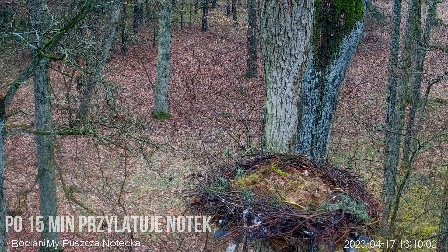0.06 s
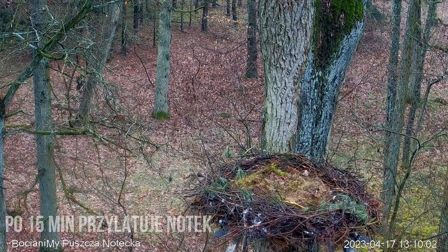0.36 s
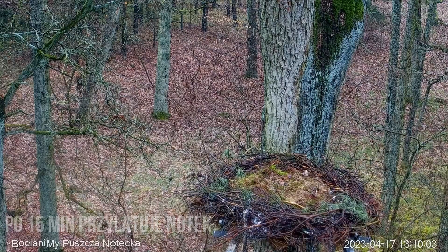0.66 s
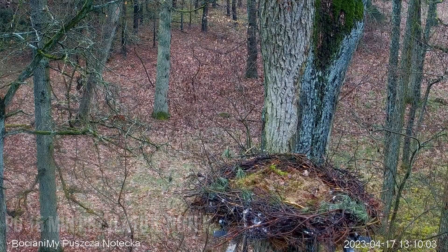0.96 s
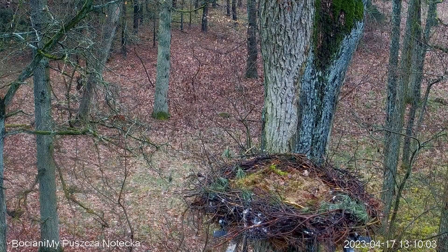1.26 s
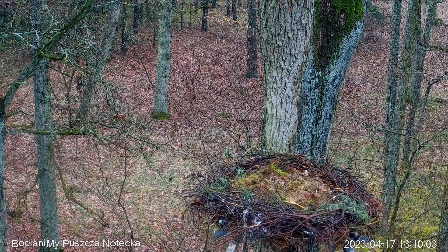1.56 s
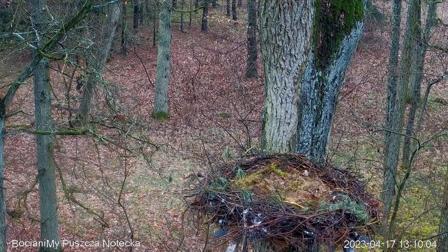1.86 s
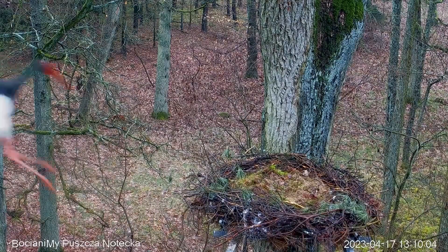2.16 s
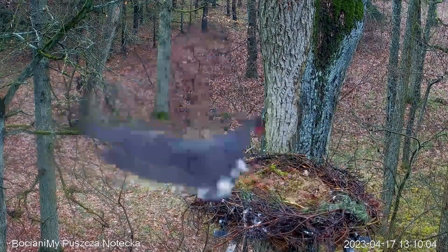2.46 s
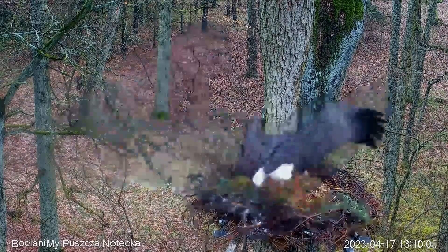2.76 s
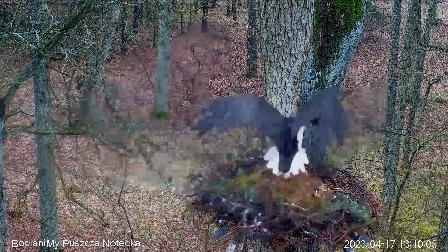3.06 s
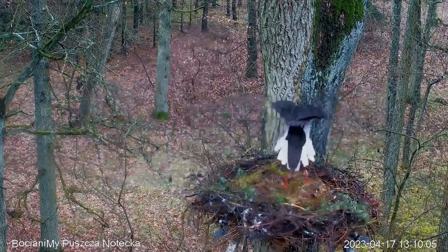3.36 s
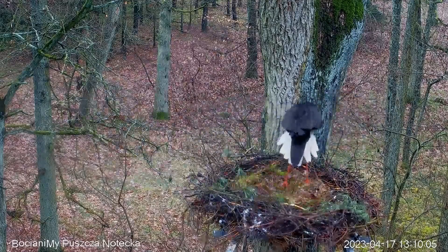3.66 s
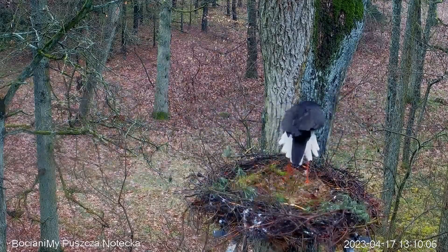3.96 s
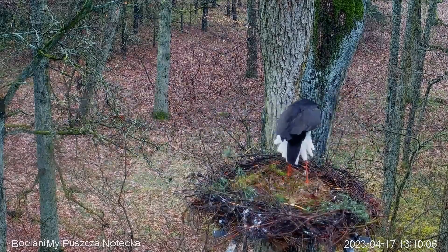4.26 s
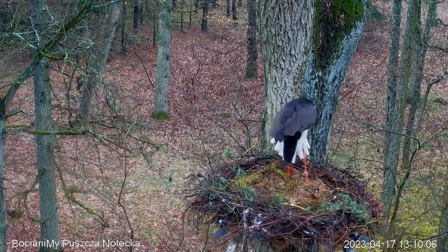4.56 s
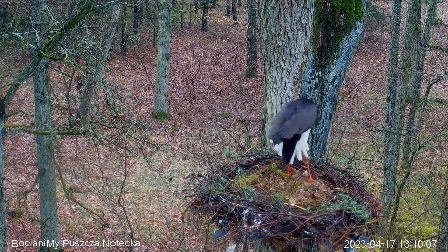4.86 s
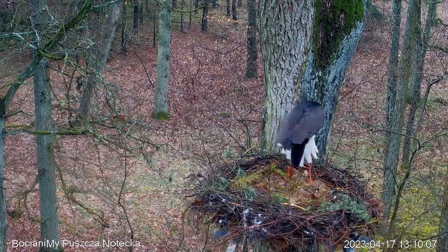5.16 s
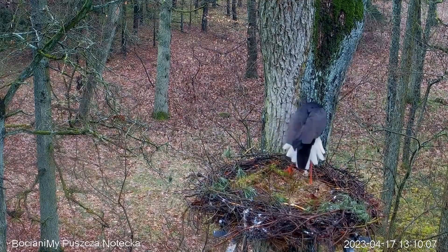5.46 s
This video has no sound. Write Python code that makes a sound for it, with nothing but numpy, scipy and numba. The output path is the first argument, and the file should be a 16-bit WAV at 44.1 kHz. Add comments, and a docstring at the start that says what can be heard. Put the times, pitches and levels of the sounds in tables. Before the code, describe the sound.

A stork arrives at its nest among trees, heard through a close, slightly dull and compressed microphone. First come a faint low murmur, thin distant birdsong and a dry twig snap. Then heavy wings swish and thump, mixed with two bright chirps, and sticks crack on landing. The stork calls about twice a second, six high arched whistles alternating with hoarse hisses, each echoing lightly. A softer crack comes near the end.

```python
"""A black stork flies in to its nest in a softly murmuring wood, where the trunks echo every call.
First small birds whistle, a twig snaps and something rasps far off. Then the stork's wings rush and
thump as it brakes, while a small bird chirps twice. The stork greets with six arched whistles that its
windpipe pulls into steps, and draws air with a hoarse hiss between them. A crack comes as it lands and
one near the end. A nest camera hears it all, with noise reduction, a hard limiter and a low sample rate."""
import sys
import numpy as np
from scipy import signal
from scipy.fft import rfft, irfft
from scipy.io import wavfile
from scipy.ndimage import uniform_filter1d, map_coordinates
from numba import njit

SR = 44100
rng = np.random.default_rng(int(sys.argv[2]) if len(sys.argv) > 2 else 0)


def output_pcm(signal):
    """Save a mono or channel-first signal as 16-bit PCM at the path in sys.argv[1].

    Samples are clipped to [-1, 1] before scaling.
    """
    pcm = np.clip(np.atleast_2d(signal).T, -1, 1) * 32767
    wavfile.write(sys.argv[1], SR, np.round(pcm).astype(np.int16))


N = 251811
T = np.arange(N) / SR

# The stork's whistles. The voice aims at these pitches; squareness 1 is a pointed arch, 3 a flat top.
# (start [s], crest [s], end [s], first pitch [Hz], crest pitch [Hz], last pitch [Hz], squareness,
# middle break going up [Hz], going down [Hz], level [dB], leaking air [dB], octave [dB], throat hiss [dB])
STORK_NOTES = [ (2.706, 2.803, 2.904, 2100, 4150, 2050, 3.1, 3880, 3990, -19.5, -20, -45, -49),
               (3.210, 3.312, 3.443, 2400, 4105, 2400, 3.1, 3915, 3300, -19.5, -22, -45, -54),
               (3.725, 3.848, 3.985, 2150, 3825, 2700, 2.9, 3660, 3260, -19, -21, -41, -55),
               (4.283, 4.414, 4.512, 3197, 4370, 3120, 1.45, 3495, 3080, -18.5, -21, -50, -48),
               (4.803, 4.945, 5.073, 2475, 3935, 2300, 3, 3620, 3516, -18.5, -21, -41, -61),
               (5.351, 5.428, 5.433, 2560, 3520, 3500, 2.5, 3900, 3900, -19, -20, -52, -66)]
# Windpipe resonances (pitches it likes to ring at) that pull on the whistle (pitch [Hz], level [dB])
PIPE_STEPS = [(2470, -2), (3440, -2.5), (3885, -0.5), (4300, -2)]
# Moments when the voice catches and turns weak and hoarse (time [s], half length [s], dip [dB])
VOICE_CATCHES = [(2.735, .009, -4), (2.776, .008, -9), (2.815, .03, -2.5), (2.848, .008, -10),
                 (2.885, .005, -6), (3.212, 0.0095, -13), (3.366, 0.015, -13), (3.42, .008, -7),
                 (3.767, 0.0098, -6), (3.975, 0.014, -14), (4.4, .04, -3.5), (4.874, 0.022, -11.5),
                 (4.91, .008, -6), (4.952, 0.011, -11), (5.04, .015, -9), (5.364, 0.012, -9),
                 (5.435, .008, -8)]
# Air that leaks past the whistle (frequency [Hz], level [dB])
LEAK_SPECTRUM = [(200, -45.5), (500, -22), (900, -19.5), (1250, -7.5), (2000, -15.5), (2620, 6), (3050, 0),
                 (3500, -11.5), (4300, -4), (5000, -9.5), (5700, -15), (8000, -26.5)]
# A soft, low wheeze (start [s], end [s], first pitch [Hz], last pitch [Hz], level [dB])
WHEEZES = [(1.72, 1.97, 1083, 1350, -54.5), (3.19, 3.25, 1020, 1080, -52), (3.29, 3.43, 1259, 1352, -48),
           (3.88, 4.10, 1176, 1318, -52.5), (4.565, 4.79, 1156, 1297, -45), (5.00, 5.23, 1298, 1214, -50.5)]
# The stork's hisses; in each one the lowest windpipe resonance slides
# (start [s], end [s], slide from [Hz], slide to [Hz], slide width [Hz], slide level [dB],
# throat [dB], windpipe [dB], bill [dB], high "sss" [dB])
STORK_HISSES = [(2.478, 2.688, 2540, 2400, 985, -35.5, -46, -39.5, -39, -51),
                (2.926, 3.164, 2585, 2260, 1110, -36.5, -43.5, -36.5, -43.5, -74.5),
                (3.489, 3.692, 2320, 2444, 774, -35.5, -39.5, -37, -45, -61),
                (4.02, 4.222, 2434, 2360, 1068, -37.5, -45, -38, -47.5, -58),
                (4.567, 4.773, 2710, 2247, 827, -40, -60, -50, -47, -56.5),
                (5.128, 5.3, 2503, 2280, 327, -37.5, -64, -37, -48.5, -55.5),
                (5.435, 5.594, 2850, 2825, 730, -40.5, -54, -34, -45, -88),
                (5.628, 5.797, 2507, 2420, 444, -45, -54, -51, -58, -76)]
# Resonances of throat, windpipe, bill and the high "sss" (frequency [Hz], width [Hz], level [dB])
THROAT_RINGS = [(1610, 190, 7.5), (1950, 220, 3)]
PIPE_RINGS = [(3430, 170, 1.5), (3847, 170, -1.5)]
BILL_RINGS = [(4534, 470, 4.9), (5005, 180, 2.4)]
SSS_RINGS = [(6150, 550, 2.5), (6880, 560, -4), (7510, 290, -7.5)]
# Wingbeats as the stork brakes
# (time [s], thump pitch [Hz], thump [dB], buffeting air [dB], feather rush [dB], wing tip hiss [dB])
WINGBEATS = [(1.499, 188, -48.5, -61, -68, -72), (1.849, 166, -46.5, -44, -53.5, -63),
             (2.043, 140.6, -24.5, -31.5, -35, -65.5), (2.296, 159, -23, -36, -37, -56.5),
             (2.52, 136, -32.5, -45.5, -51.5, -60.5), (2.7, 189, -39.5, -68.5, -52, -52)]
# Buffeting air, rushing feathers and hissing wing tips (frequency [Hz], level [dB])
BUFFET_SPECTRUM = [(30, -58), (70, -28), (100, -11.5), (125, -2), (160, 4), (230, -1), (320, -19.5),
                   (600, -57.5)]
FEATHER_SPECTRUM = [(50, -35), (150, -18), (350, -3), (550, 2.5), (750, -2), (1300, 9), (2000, 2.5),
                    (3200, -4), (5000, -7), (6800, -16), (8000, -38)]
WING_TIP_SPECTRUM = [(1500, -26), (3000, -4.5), (5000, -2.5), (6800, -7), (8000, -6)]
# A twig snaps and its echoes follow; later, two more cracks (time [s], strength [dB])
SNAPS_AND_ECHOES = [(0.9284, -21.5), (0.9305, -21), (0.9361, -22.5), (0.94, -38), (0.9696, -33.5),
                    (1.106, -47.5), (2.535, -19), (5.643, -36.5)]
# Resonances of a dry twig (frequency [Hz], width [Hz], level [dB])
TWIG_RINGS = [(863, 330, -5.5), (1820, 600, -7.5), (2020, 590, 0), (3520, 1660, -5.5), (5190, 1250, -13)]
# One small bird's repeated chirp (time of highest pitch [s], level [dB])
BIRD_CHIRPS = [(1.906, -29), (2.148, -26.5)]
# Thin whistles of small birds (start [s], end [s], first pitch [Hz], last pitch [Hz], level [dB])
BIRD_NOTES = [(0, .08, 4405, 4480, -55), (1.21, 1.83, 4920, 4810, -72), (1.31, 1.38, 4840, 4900, -62),
              (1.60, 1.76, 7690, 6880, -64.5), (1.781, 1.845, 7110, 5120, -52.5),
              (2.418, 2.447, 2672, 2770, -39), (4.14, 4.29, 7550, 7410, -60.5)]
# Resonances of a far-off rasping call (frequency [Hz], width [Hz], level [dB])
RASP_RINGS = [(2567, 350, -5.5), (3420, 400, -8)]
# The wood's low murmur and its faint rustle (frequency [Hz], level [dB])
MURMUR_SPECTRUM = [(25, -29.5), (60, -32.5), (90, -11), (130, 6), (170, 3), (230, -3), (330, -29.5),
                   (700, -50.5)]
RUSTLE_SPECTRUM = [(100, -13), (300, -6.5), (700, -0.5), (2000, -5.5), (4000, -2.5), (8000, -15.5)]
# Echoes off the nearest trunks and branches (delay [s], level [dB])
TRUNK_ECHOES = [(.0075, -15), (0.0104, -15), (0.044, -24.5)]
# How the camera boosts or cuts the treble (frequency [Hz], gain [dB])
CAMERA_TREBLE = [(6500, -1.5), (7500, 3.5), (8000, 0), (8600, -2), (9300, -36), (10500, -53.5),
                 (12000, -52), (15000, -59.5)]


def whistles(jitter=.018, flutter_db=3.8, octave_growth=1.64, edge_s=.003):
    """The stork's notes: a hoarser one leaks more air and wavers more; a catch brings out the octave."""
    out = np.zeros(N)
    air = patchy(noise(LEAK_SPECTRUM), db=8)
    waver, flutter = wander(500), wander(170)
    throat = blown(THROAT_RINGS[:1], np.ones(N))
    catch_db = sum(db * np.exp(-((T - at) / length) ** 2) for at, length, db in VOICE_CATCHES)
    for start, crest, end, *shape, db, leak_db, octave_db, throat_db in STORK_NOTES:
        envelope = gate(start, end, edge_s)
        on = envelope > .001
        hz, gain = windpipe_steps(T[on], start, crest, end, *shape)
        hoarse = undb(leak_db - catch_db[on])
        phase = 2 * np.pi * np.cumsum(hz * (1 + jitter * hoarse * waver[on])) / SR
        octave = undb(octave_db - octave_growth * catch_db[on])
        tone = np.sqrt(2) * (np.sin(phase) + octave * np.sin(2 * phase))
        tone *= undb(flutter_db * np.sqrt(hoarse) * flutter[on])
        out[on] += undb(db + catch_db[on]) * envelope[on] * gain * (tone + hoarse * air[on])
        out += undb(throat_db) * envelope * throat
    return out


def windpipe_steps(t, start, crest, end, first, top, last, squareness, break_up, break_down,
                   low_break_hz=3002, high_break_hz=4140, pull=.51):
    """One whistle's pitch and gain: the voice arches smoothly, the windpipe pulls it into steps."""
    strain = 1 - np.interp(t, [start, crest, end], [1, 0, 1]) ** squareness
    foot = np.where(t < crest, first, last)
    aim = foot + (top - foot) * strain
    middle_break = np.where(t < crest, break_up, break_down)
    step = np.sum([aim > low_break_hz, aim > middle_break, aim > high_break_hz], axis=0)
    pipe_hz, pipe_db = np.array(PIPE_STEPS)[step].T
    hz = aim + pull * (pipe_hz - aim)
    gain = undb(pipe_db)
    for i in np.flatnonzero(np.diff(step)):  # the tone falters at each break, more for a wider jump
        jump_hz = abs(hz[i + 1] - hz[i])
        depth, falter_s = min(1, jump_hz / 400), 1.4e-5 * jump_hz
        gain *= 1 - depth * np.exp(-((t - t[i]) / falter_s) ** 2)
    return hz, gain


def hisses(core_width_hz=170, core_db=-3, crest=.59, swell_db=14, rasp_db=1.77, waver_db=.8):
    """The stork draws air with a hoarse hiss that brightens and shifts as its throat tightens."""
    tighten, slide, throat, pipe, bill, sss = np.zeros((6, N))
    for start, end, first, last, width, slide_db, throat_db, pipe_db, bill_db, sss_db in STORK_HISSES:
        on = gate(start, end, .018)
        progress = np.clip((T - start) / (end - start), 0, 1)
        slack_db = -swell_db * ((progress - crest) / crest) ** 2  # quieter either side of the crest
        tighten += on * (progress - .5)
        slide_hz = first + (last - first) * progress
        broad = unit(resonance(rng.standard_normal(N), slide_hz, width))
        core = unit(resonance(rng.standard_normal(N), slide_hz, core_width_hz))  # half whistled
        slide += on * undb(slide_db + .051 * slack_db) * unit(broad + undb(core_db) * core)
        throat += on * undb(throat_db + .42 * slack_db)
        pipe += on * undb(pipe_db + .33 * slack_db)
        bill += on * undb(bill_db + slack_db)
        sss += on * undb(sss_db + 2.5 * slack_db)
    pipe_stretch = 1 + .022 * tighten
    air = (slide
           + throat * blown(THROAT_RINGS, 1 + .26 * tighten)
           + pipe * blown(PIPE_RINGS, pipe_stretch)
           + bill * blown(BILL_RINGS, 1 + .08 * tighten)
           + sss * blown(SSS_RINGS, pipe_stretch))
    air = np.std(air) * patchy(air, db=3)
    return air * undb(rasp_db * wander(350) + waver_db * wander(35))


def wheeze():
    """Soft, low tones under the stork's whistles and hisses."""
    return tones(WHEEZES, bow=680, edge_s=.026, jitter=.015, flutter_db=2.5, octave_db=-26.5)


def wings(arrive_s=1.836, fold_s=2.703, lead_s=.028, thump_s=.018, sag_hz_per_s=1160, flutter_db=2):
    """Air streams over the braking wings; each downstroke swishes, then thumps with a puff of air."""
    approach_db = -140 * np.maximum(arrive_s - T, 0)
    fold_db = -201.5 * np.maximum(T - fold_s, 0)
    glide = undb(approach_db + fold_db)
    buffet, rush = undb(-46) * glide, undb(-46.5) * glide
    tips, thumps = np.zeros((2, N))
    for at, hz, thump_db, buffet_db, rush_db, tips_db in WINGBEATS:
        swish = downstroke(at - lead_s)
        tips += undb(tips_db) * swish
        rush += undb(rush_db) * swish
        buffet += undb(buffet_db) * downstroke(at)
        age = T - at
        phase = 2 * np.pi * (hz - sag_hz_per_s * age / 2) * age  # deepens as the wing passes
        thumps += undb(thump_db) * np.exp(-.5 * (age / thump_s) ** 2) * np.sin(phase)
    feathers = patchy(noise(FEATHER_SPECTRUM), db=2.5)
    near = np.interp(T, [1.78, 1.92], [0, 1])  # from further off the feathers sound duller
    feathers = near * feathers + (1 - near) * colour(feathers, [(1600, 4.5), (2600, 2)])
    feathers *= undb(flutter_db * wander(120))
    return rush * feathers + tips * noise(WING_TIP_SPECTRUM) + buffet * noise(BUFFET_SPECTRUM) + thumps


def downstroke(at, rise_s=.027, fall_s=.093):
    """The loudness of one wingbeat swells quickly and dies away more slowly."""
    return np.exp(-.5 * ((T - at) / np.where(T < at, rise_s, fall_s)) ** 2)


def twigs(crack_s=.001, splinter_s=.03, splinter_db=-20):
    """A snap, its echoes and two later cracks: sharp bursts with splintering tails ring like dry wood."""
    force = np.zeros(N)
    for at, db in SNAPS_AND_ECHOES:
        age = T[T >= at] - at
        splinters = undb(splinter_db) * np.exp(-age / splinter_s)
        force[T >= at] += undb(db) * (np.exp(-age / crack_s) + splinters)
    wood = sum(undb(db) * resonance(force * rng.standard_normal(N), hz * np.ones(N), width)
               for hz, width, db in TWIG_RINGS)
    return undb(10.5) * wood


def chirps(foot_hz=2540, top_hz=4454, end_hz=4186, sweep_s=.034, sag_s=.042, fade_db_per_s=110):
    """A small bird sings a soft, reedy upward sweep, then a loud note that sags and fades."""
    song = np.zeros(N)
    for at, db in BIRD_CHIRPS:
        song += tones([(at - sweep_s, at, foot_hz, end_hz, db - 15)],
                      edge_s=.0096, jitter=.034, flutter_db=.5, octave_db=-24)
        note = tones([(at, at + sag_s, top_hz, end_hz, db)],
                     edge_s=.004, jitter=.0082, flutter_db=1.5, octave_db=-34.5)
        song += note * undb(-fade_db_per_s * np.maximum(T - at, 0))
    return song


def songbirds():
    """Small birds whistle thin, almost pure notes in the trees."""
    return tones(BIRD_NOTES, edge_s=.0076, jitter=.0065, flutter_db=2.8, octave_db=-41.5)


def far_rasp(rise=.059):
    """One rasping call from among the trees, rising a little in pitch."""
    db = np.interp(T, [1.295, 1.312, 1.43, 1.5, 1.58], [-70.5, -50.5, -47.5, -50.5, -78])
    stretch = 1 + rise * np.interp(T, [1.3, 1.45], [-.5, .5])
    loudness = undb(db + 1.9 * wander(250)) * gate(1.28, 1.6, .005)
    return loudness * patchy(blown(RASP_RINGS, stretch), db=5)


def murmur(low_db=-68, swell_db=3.5, rustle_db=-73.5):
    """Low, restless air in the wood, with faint rustles."""
    low = undb(low_db + swell_db * wander(25)) * patchy(noise(MURMUR_SPECTRUM), db=2.5, width_hz=33)
    return low + undb(rustle_db) * patchy(noise(RUSTLE_SPECTRUM), db=4.5)


def forest(x, tail_db, decay_s, build_s=.0009):
    """Near trunks echo at once; far ones blur into a tail that falls 60 dB in decay_s."""
    t = T[:SR]
    tail = colour(rng.standard_normal(SR), [(200, -20.5), (800, 4), (4000, 3.5), (8000, -2)])
    tail *= np.exp(-np.log(1000) * t / decay_s) * (1 - np.exp(-t / build_s))
    echoes = undb(tail_db) * tail / np.sqrt(np.sum(tail ** 2))
    for delay, db in TRUNK_ECHOES:
        echoes[int(delay * SR)] += undb(db)
    return x + signal.fftconvolve(x, echoes)[:N]


def tones(table, edge_s, jitter, flutter_db, octave_db, bow=0):
    """Almost pure sliding notes; bow [Hz per s squared] lifts the pitch in the middle of each."""
    out = np.zeros(N)
    waver, flutter = 1 + jitter * wander(500), undb(flutter_db * wander(90))
    for start, end, first, last, db in table:
        on = (T > start - edge_s) & (T < end + edge_s)
        t = T[on]
        hz = np.interp(t, [start, end], [first, last]) + bow * (t - start) * (end - t)
        phase = 2 * np.pi * np.cumsum(hz * waver[on]) / SR
        inside = np.clip(np.minimum(t - start, end - t) / edge_s, -1, 1)
        fade = .5 + .5 * np.sin(np.pi / 2 * inside)
        tone = np.sqrt(2) * (np.sin(phase) + undb(octave_db) * np.sin(2 * phase))
        out[on] += undb(db) * flutter[on] * fade * tone
    return out


def blown(rings, stretch):
    """Rushing air through resonances whose frequencies are all multiplied by stretch."""
    return unit(sum(undb(db) * resonance(rng.standard_normal(N), hz * stretch, width)
                    for hz, width, db in rings))


def patchy(x, db, width_hz=170, hold_s=.06):
    """Make the sound patchy and streaky: each narrow band swells and fades at random."""
    f, t, cells = signal.stft(x, SR, nperseg=512)
    chance = rng.standard_normal((1024, 1024))
    grid = np.meshgrid(f / width_hz, t / hold_s, indexing="ij")
    swell = map_coordinates(chance, grid, order=1, mode="wrap")
    return unit(signal.istft(cells * undb(db * unit(swell)), SR)[1][:N])


def resonance(x, hz, width):
    """Keep the sound near hz, filtering twice for a sharper cut."""
    return bandpass(bandpass(x, hz, float(width)), hz, float(width))


@njit
def bandpass(x, hz, width):
    """A filter that lets through one band, whose centre can move."""
    y, band, low = np.empty(len(x)), 0., 0.
    for i in range(len(x)):
        tuning, damping = np.tan(np.pi * hz[i] / SR), width / hz[i]
        ring = (band + tuning * (x[i] - low)) / (1 + tuning * (tuning + damping))
        band, low = 2 * ring - band, low + 2 * tuning * ring
        y[i] = damping * ring
    return y


def noise(points):
    """Noise shaped by a spectrum, with an average (rms) size of 1."""
    return unit(colour(rng.standard_normal(N), points))


def colour(x, points):
    """Boost or cut x along a curve of (frequency [Hz], gain [dB]) points."""
    hz, db = np.transpose(points)
    f = np.maximum(np.fft.rfftfreq(len(x), 1 / SR), 1)
    return irfft(rfft(x) * undb(np.interp(np.log(f), np.log(hz), db)), len(x))


def wander(rate):
    """A smooth random wobble that changes about rate times a second."""
    hold = max(int(SR / rate), 1)
    steps = np.repeat(rng.standard_normal(N // hold + 1), hold)
    return unit(uniform_filter1d(steps, hold)[:N])


def gate(start, end, edge):
    """1 from start to end and 0 outside, with soft edges."""
    return (1 + np.tanh((T - start) / edge)) / 2 * (1 + np.tanh((end - T) / edge)) / 2


def unit(x):
    """Scale to an average (rms) size of 1."""
    return x / np.sqrt(np.mean(x ** 2))


def undb(db):
    """Turn decibels into a number to multiply by."""
    return 10 ** (np.asarray(db) / 20)


def reduce_noise(x, quiet_db=-90.5, floor_db=-7.5):
    """The camera turns down bands that stay quiet, so echoes break up and die early."""
    cells = signal.stft(x, SR, nperseg=512)[2]
    power = uniform_filter1d(np.abs(cells) ** 2, size=7, axis=1) + 1e-18
    gain = np.maximum(power / (power + undb(quiet_db) ** 2), undb(floor_db))
    return signal.istft(cells * gain, SR)[1][:N]


def limiter(x, ceiling_db=-17.35, attack_s=.0005, release_s=.027):
    """The camera turns loud peaks down, a moment late, so sudden ones slip past."""
    peaks = peak_follower(x, np.exp(-1 / (release_s * SR)))
    wanted_cut = np.maximum(0, 1 - undb(ceiling_db) / (peaks + 1e-9))
    lag = np.exp(-1 / (attack_s * SR))
    cut = signal.lfilter([1 - lag], [1, -lag], wanted_cut)
    return x * (1 - cut)


@njit
def peak_follower(x, release):
    """Jump to each peak and sink back slowly."""
    y, peak = np.empty(len(x)), 0.
    for i in range(len(x)):
        peak = max(abs(x[i]), peak * release)
        y[i] = peak
    return y


def cut_above(x, hz):
    """Steeply remove the sound above hz."""
    return signal.sosfilt(signal.ellip(8, .2, 70, hz, fs=SR, output="sos"), x)


def scene():
    """The stork is close; the small birds are further off and echo more."""
    voice = forest(whistles() + wheeze(), tail_db=-15, decay_s=.84)
    breath_and_wings = forest(hisses() + wings(), tail_db=-17, decay_s=.98)
    birds = forest(songbirds(), tail_db=-2, decay_s=.37)
    cracks_and_rasp = forest(twigs() + far_rasp(), tail_db=-15.5, decay_s=.61)
    chirping = forest(chirps(), tail_db=-5.5, decay_s=.9, build_s=.03)
    return (voice + breath_and_wings + birds + cracks_and_rasp + chirping + murmur())[None]


def record(dry, camera_rate_hz=16000, max_db=-17.6, top_hz=15700):
    """The camera lowers noise and limits peaks; its low sample rate mirrors the treble about 8 kHz."""
    limited = limiter(reduce_noise(dry[0]))
    band = cut_above(limited, camera_rate_hz / 2)
    mirrored = band * (1 + 2 * np.cos(2 * np.pi * camera_rate_hz * T))
    shaped = colour(mirrored, CAMERA_TREBLE)
    flattened = np.clip(shaped, -undb(max_db), undb(max_db))  # peaks that slip past make a tick
    return cut_above(flattened, top_hz)[None]


dry = scene()
out = record(dry)
output_pcm(out)
```